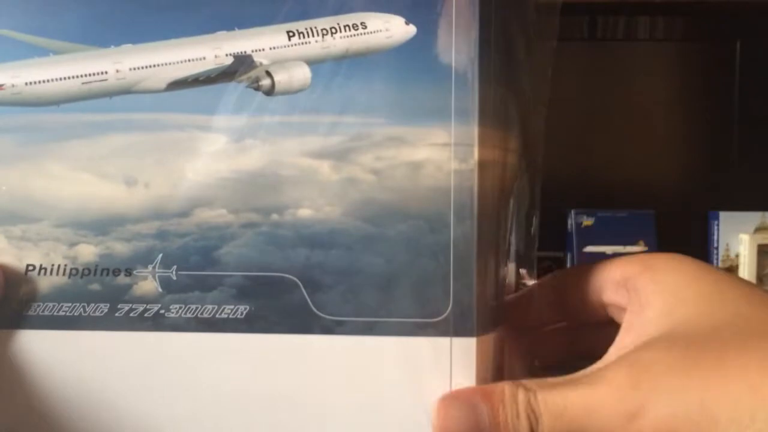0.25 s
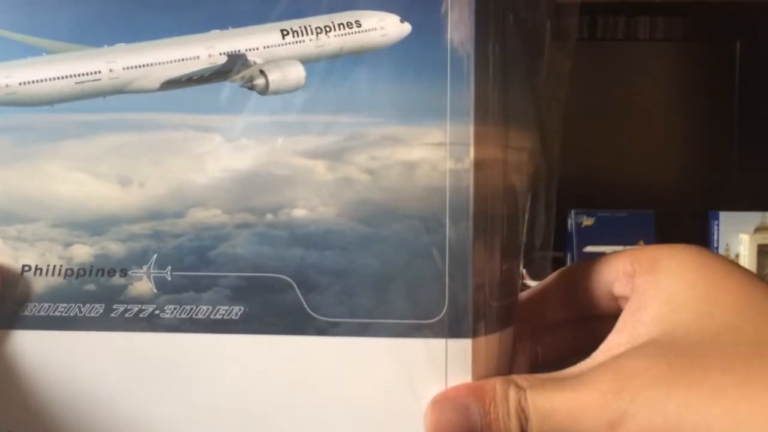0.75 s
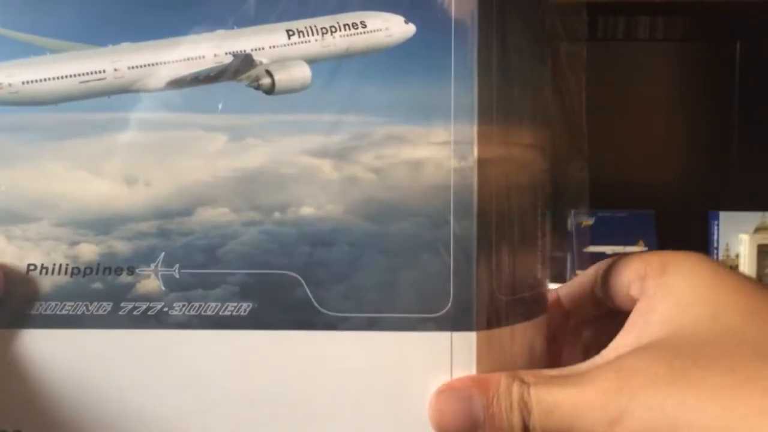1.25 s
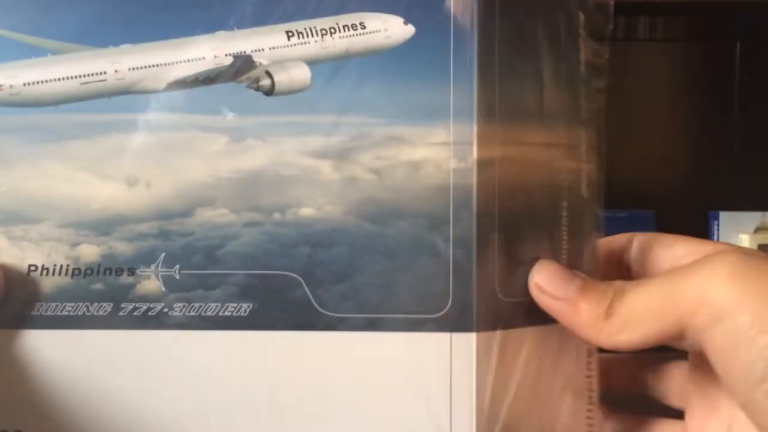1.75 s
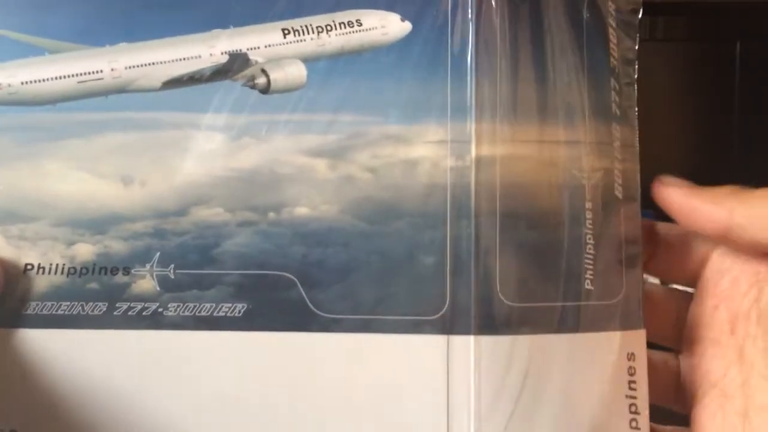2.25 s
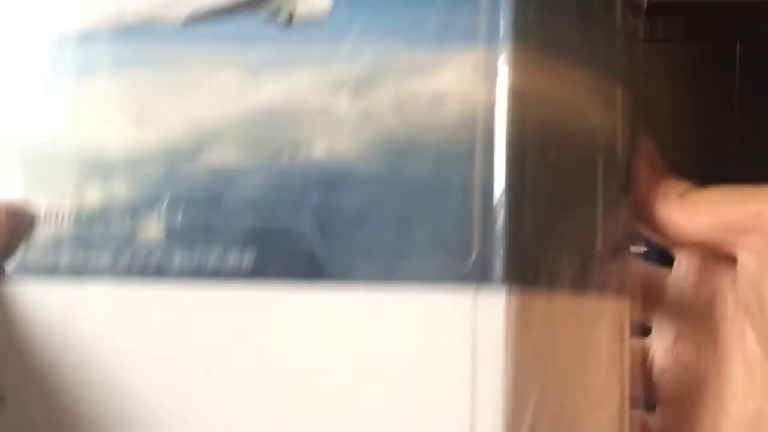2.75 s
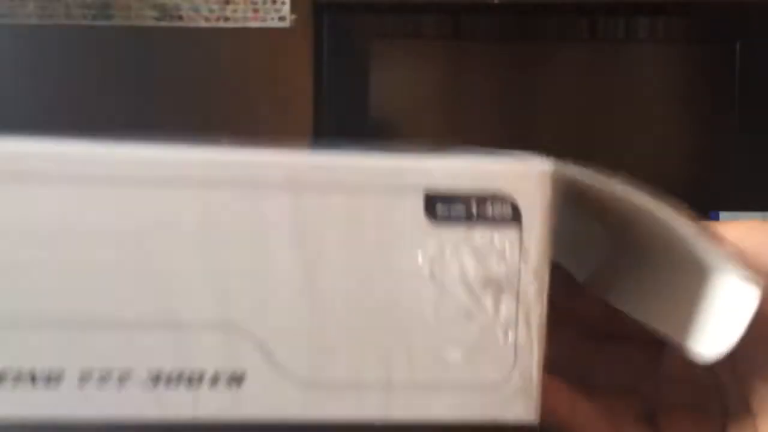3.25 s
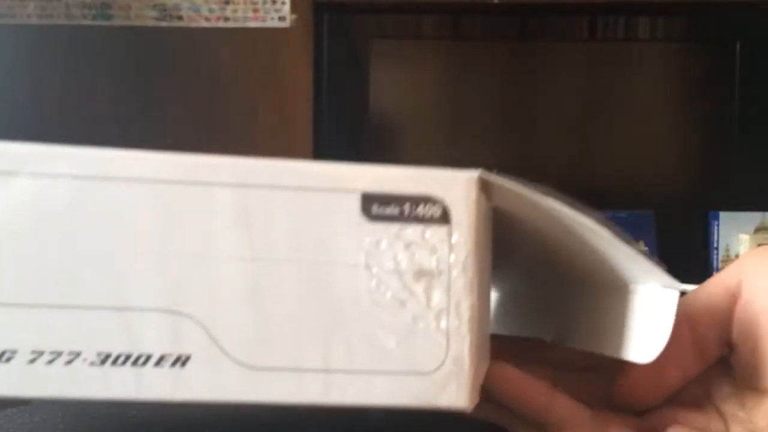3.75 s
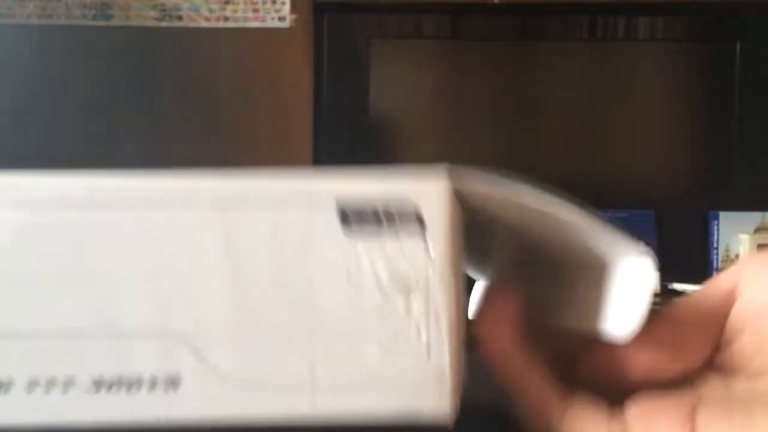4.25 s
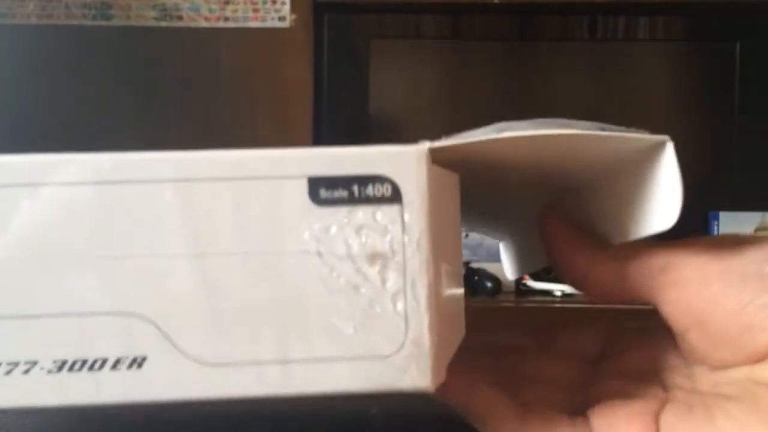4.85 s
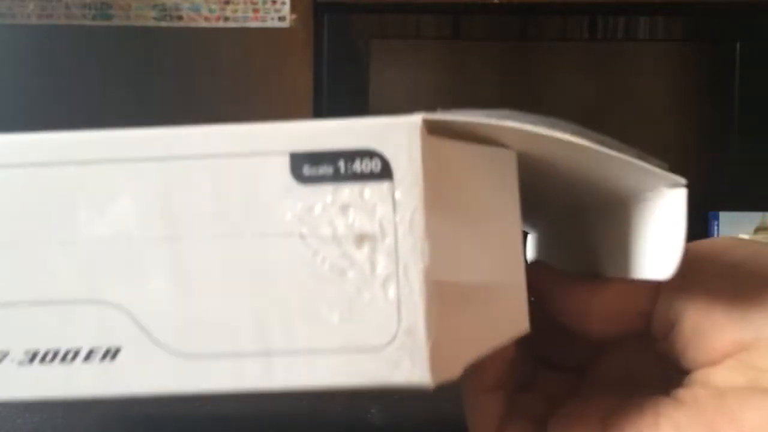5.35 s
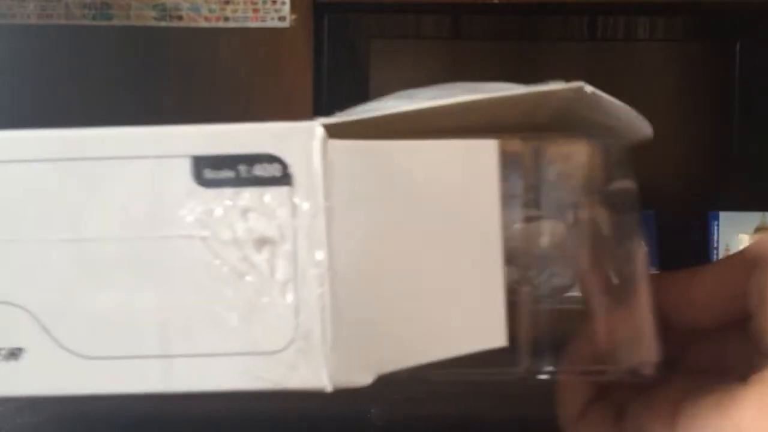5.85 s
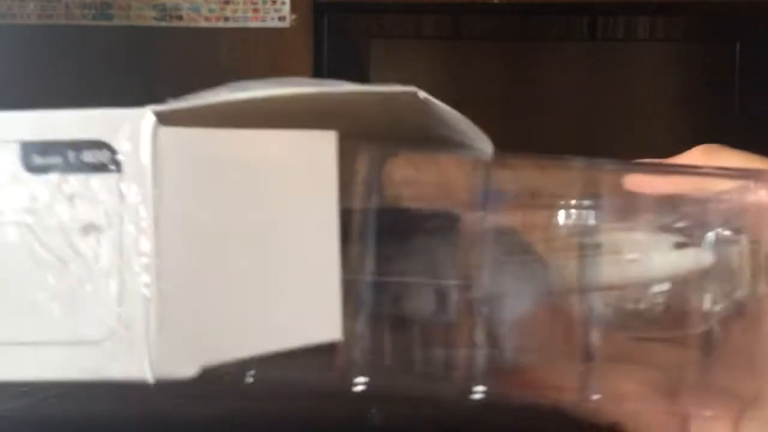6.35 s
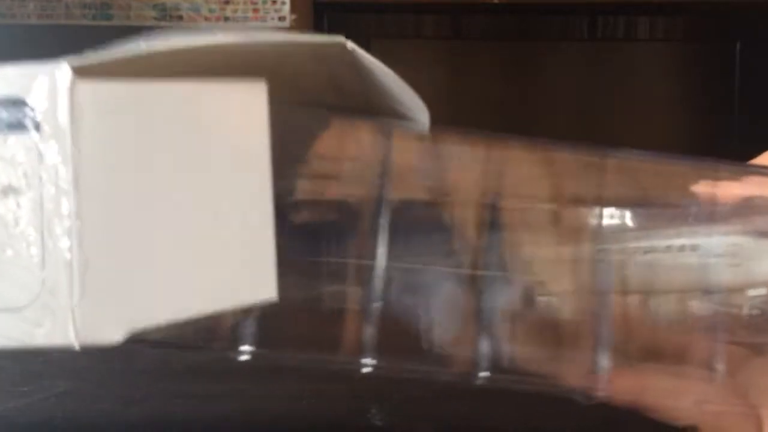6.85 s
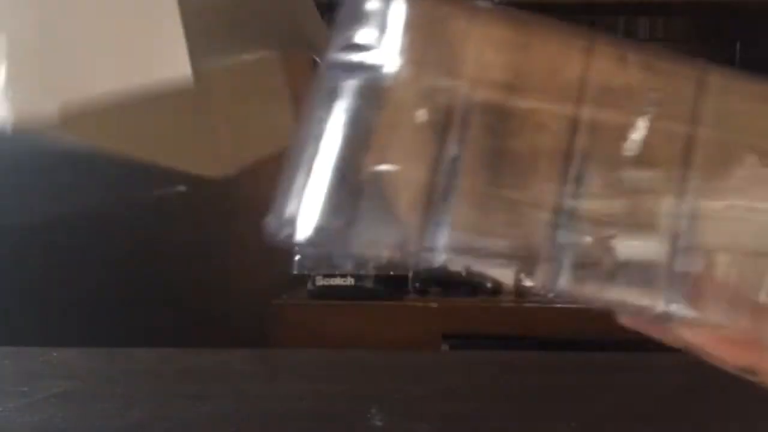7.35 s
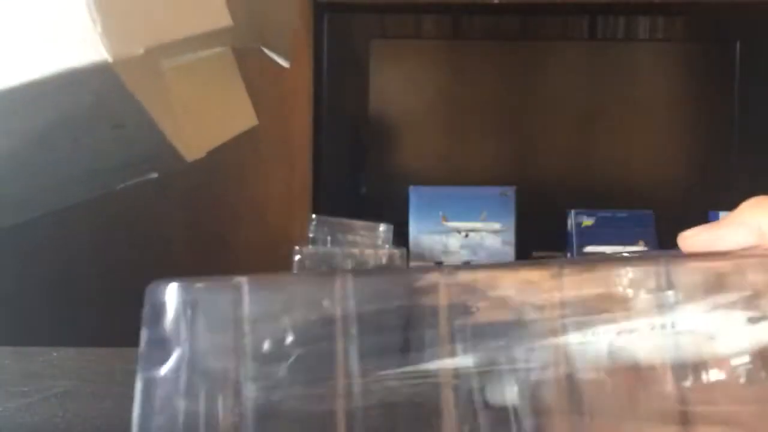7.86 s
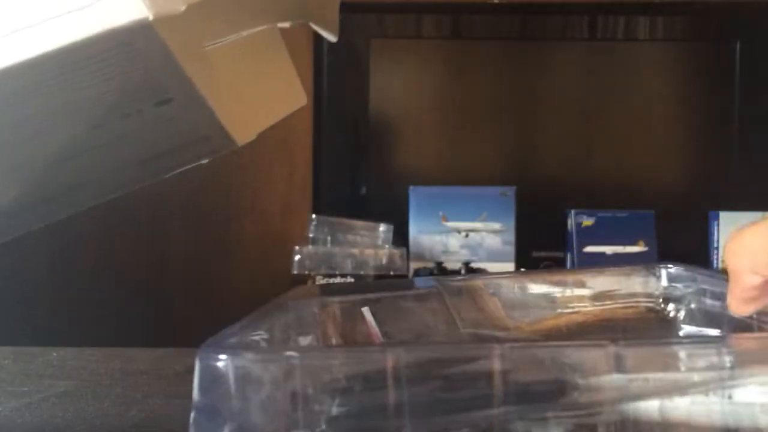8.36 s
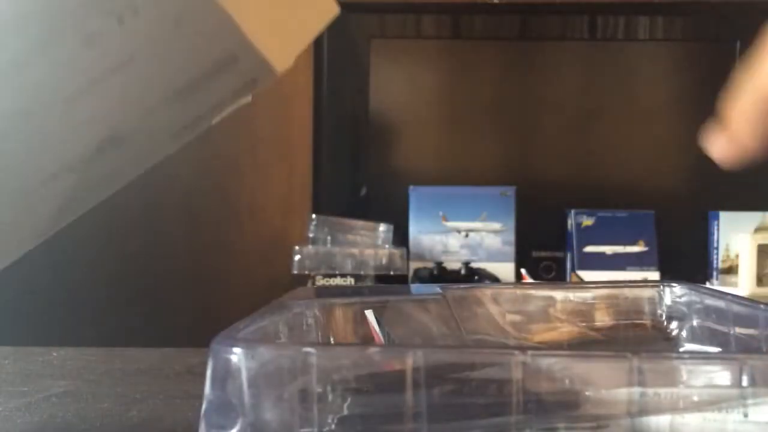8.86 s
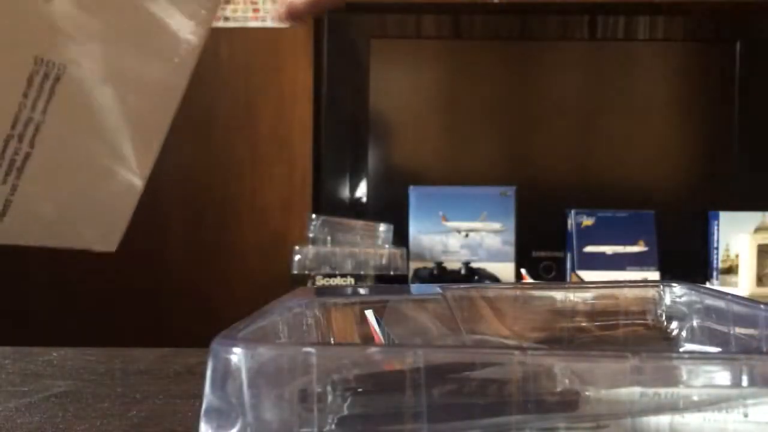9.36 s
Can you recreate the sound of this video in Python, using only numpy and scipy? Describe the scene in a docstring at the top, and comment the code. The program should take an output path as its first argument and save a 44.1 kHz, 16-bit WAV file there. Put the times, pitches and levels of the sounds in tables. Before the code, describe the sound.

A close phone microphone in a small room, with faint air noise and a low mains hum. Hands rub a glossy card box with faint ticks; at about 1.15 seconds a tight cluster of loud, hard snaps bursts out, with smaller creaky knocks at 1.25. Quiet scrapes and light film crackles follow until a sharp pop at 2.8. Soft rubbing continues; clicks and creaks gather from 4.2 to 4.55, and a bright crackling snap hits at 4.8. From 5.4 to 6.5 a gritty, steady drag draws the stiff plastic tray out, with knocks at 5.75 and 6.2. After a quieter stretch come clacks around 7.1 to 7.3. A loud, hard knock lands at 7.9, then crackly plastic clatter and dull thuds from 8.05 to 8.8, including a short buzz at 8.64. Only faint rubs and ticks remain to about 9.5.

```python
"""A glossy cardboard box pops, knocks and scrapes as hands open it and slide a stiff clear plastic tray out.
Pops and knocks are bursts of noise and short pushes that ring the panels, the plastic and the air in the box.
Rubbing and the long pull are gritty noise shaped by card, glossy skin and thin film, with a low shudder below.
Small creaks, film crackles, soft thuds of the palm and one buzz of the tray are added.
A small room answers over air noise and a faint mains hum, all heard close to a phone."""
import sys
import numpy as np
from scipy import signal
from scipy.fft import rfft, irfft, next_fast_len
from scipy.io import wavfile
from scipy.ndimage import uniform_filter1d, map_coordinates

SR = 44100
rng = np.random.default_rng(int(sys.argv[2]) if len(sys.argv) > 2 else 0)


def master(y):
    """Save y as 16-bit WAV."""
    cut = np.clip(np.atleast_2d(y).T, -1, 1)
    pcm = np.round(cut * 32767)  # scale
    wavfile.write(sys.argv[1], SR, pcm.astype(np.int16))


N = 422919  # length in samples

# pops and knocks: start_s, level_db, panel_pitch_hz, snap_db and thump_db (beside the body), rattle_t60_s,
# crease_pitch_hz
POP_EVENTS = [(0.013, -27.5, 330, -17, -15, 0.11, 2820), (0.068, -34, 320, -14.5, -16, 0.032, 9300),
              (0.221, -31, 770, -11, -6, 0.029, 4900), (0.34, -48, 460, -6, -29, 0.067, 10100),
              (0.534, -25.5, 465, -27, -46, 0.085, 2780), (0.799, -26, 704, -27, -42, 0.067, 2770),
              (0.854, -30.5, 496, -39, -27, 0.068, 2850), (0.886, -36, 458, -31, -29, 0.11, 2830),
              (0.97, -33, 818, -25, -32, 0.081, 2800), (0.982, -28.5, 550, -27, -37, 0.12, 3390),
              (1.052, -37, 800, -25, -30, 0.045, 2800), (1.065, -29, 828, -27, -35, 0.094, 3570),
              (1.079, -35, 477, -20, -26, 0.06, 2810), (1.099, -42, 821, -19, -13, 0.11, 2820),
              (1.129, -10, 1020, -9.5, -17, 0.016, 2760), (1.135, -8.5, 549, -21.5, -20, 0.042, 3830),
              (1.157, -11.5, 1600, -16, -25.5, 0.031, 2920), (1.169, -4, 680, -25, -28, 0.03, 2800),
              (1.17, -4, 1600, -18.5, -28, 0.046, 2810), (1.251, -19.5, 517, -22, -14.5, 0.074, 3400),
              (1.263, -19.5, 607, -15.5, -19, 0.03, 3270), (1.397, -34.5, 766, -18, -12, 0.043, 2880),
              (1.455, -35, 557, -16, -12, 0.21, 3240), (1.508, -27, 1700, -13, -38, 0.023, 9960),
              (1.519, -28, 480, -3.5, -17, 0.063, 10500), (1.624, -40, 1620, -16, -27, 0.08, 2780),
              (1.67, -39, 358, -22, -10, 0.098, 13800), (1.933, -34.5, 334, -21, -22, 0.083, 2800),
              (2.001, -32.5, 1900, -19, -9, 0.076, 3100), (2.016, -25.5, 500, -24, -18, 0.19, 2880),
              (2.15, -23.5, 1600, -19, -20, 0.024, 2300), (2.156, -24.5, 2240, -25, -19, 0.069, 2780),
              (2.205, -31, 1630, -15, -19, 0.28, 3020), (2.234, -27.5, 1690, -13, -22, 0.15, 2780),
              (2.317, -38, 1670, -16.5, -22, 0.11, 6700), (2.751, -29, 1515, -26, -20, 0.077, 3430),
              (2.787, -25, 1700, -16, -10, 0.038, 3500), (2.813, -11, 762, -12.5, -18.5, 0.051, 4020),
              (3.019, -35, 990, -20, -31, 0.06, 2800), (3.086, -25, 820, -25.5, -25, 0.046, 3750),
              (3.122, -34.5, 626, -18, -19, 0.051, 3880), (3.19, -35, 616, -9, -35, 0.19, 3930),
              (3.227, -32.5, 587, -11.5, -12, 0.068, 4010), (3.347, -23, 490, -23.5, -25, 0.039, 2970),
              (3.48, -32.5, 855, -23.5, -34, 0.11, 2910), (3.607, -38, 442, -14.5, -27.5, 0.037, 4340),
              (3.997, -33.5, 434, -23.5, -15.5, 0.092, 2840), (4.039, -30.5, 338, -17, -15, 0.035, 5100),
              (4.057, -26.5, 356, -18.5, -23, 0.091, 8300), (4.113, -22.5, 660, -25, -23, 0.054, 3270),
              (4.151, -44, 355, -4, -20, 0.22, 2740), (4.176, -14, 824, -20.5, -23, 0.096, 3160),
              (4.198, -24, 500, -18, -27, 0.045, 3100), (4.223, -20.5, 450, -20, -12, 0.093, 3170),
              (4.294, -36, 635, -17, -22, 0.036, 2810), (4.32, -31, 961, -18, -23, 0.095, 2980),
              (4.36, -33, 910, -28, -30, 0.046, 3200), (4.373, -24.5, 600, -27, -36, 0.083, 3230),
              (4.432, -30, 1870, -23, -20, 0.04, 2960), (4.446, -27.5, 423, -10.5, -17, 0.17, 2764),
              (4.462, -26, 440, -14, -12, 0.14, 2790), (4.483, -27.5, 630, -14, -15, 0.2, 2740),
              (4.535, -24, 1680, -19.5, -17, 0.053, 3150), (4.703, -39.5, 860, -20.5, -12, 0.16, 3500),
              (4.756, -34.5, 590, -23, -23, 0.049, 2800), (4.823, -13, 865, -14, -25.5, 0.047, 4160),
              (4.893, -28.5, 649, -9.5, -10, 0.055, 3500), (4.983, -39, 584, -13, -13, 0.076, 3100),
              (5.068, -28.5, 706, -19.5, -25, 0.076, 3970), (5.143, -26, 700, -27.5, -25, 0.077, 3200),
              (5.213, -29, 650, -30, -22, 0.047, 3560), (5.329, -33, 460, -29, -15, 0.087, 2820),
              (5.525, -30, 485, -15, -29, 0.078, 2930), (5.542, -29, 635, -24, -21, 0.065, 3050),
              (5.581, -26, 762, -24, -18, 0.06, 3330), (5.732, -17, 630, -19, -41, 0.059, 3440),
              (5.752, -10.5, 507, -16, -26.5, 0.031, 2800), (5.883, -20.5, 343, -15, -7.5, 0.061, 3460),
              (6.218, -16.5, 600, -30.5, -31, 0.041, 3860), (6.307, -28, 1340, -19, -28, 0.15, 3180),
              (6.433, -27, 692, -10, -21, 0.071, 3420), (6.852, -44, 700, -10, -27, 0.033, 3500),
              (6.985, -31.5, 620, -24, -29, 0.055, 2800), (7.037, -19.5, 517, -14.5, -12, 0.11, 3270),
              (7.054, -29, 503, -11, -24, 0.074, 3000), (7.087, -13, 330.5, -24, -29, 0.061, 3820),
              (7.161, -16.5, 625, -15, -23, 0.076, 2630), (7.174, -27.5, 345, -21, -12.5, 0.089, 3450),
              (7.231, -32.5, 689, -13.5, -26, 0.067, 2820), (7.277, -13.5, 666, -21.5, -22.5, 0.06, 6650),
              (7.318, -33, 795, -20, -21, 0.06, 3010), (7.379, -31, 756, -9.5, -20, 0.079, 2950),
              (7.402, -31.5, 605, -31, -16, 0.049, 3860), (7.872, -19.5, 522, -42, -37, 0.031, 3030),
              (7.875, -5.5, 650, -30, -20.5, 0.06, 3340), (8.02, -25.5, 369, -33, -30, 0.087, 3230),
              (8.03, -17, 725, -33, -21, 0.1, 2840), (8.042, -16.5, 620, -13, -24, 0.083, 3030),
              (8.082, -23, 560, -24, -20, 0.04, 2900), (8.111, -24, 1350, -25.5, -37, 0.2, 3530),
              (8.268, -32.5, 1900, -15, -24, 0.049, 2890), (8.287, -32, 1230, -14, -14, 0.087, 2900),
              (8.32, -33, 706, -24, -26, 0.067, 4160), (8.339, -17, 1010, -14, -15.5, 0.14, 3680),
              (8.401, -24.5, 1080, -20.5, -20, 0.24, 4120), (8.425, -26, 614, -23, -25, 0.049, 2900),
              (8.487, -31, 630, -24, -29, 0.092, 2900), (8.505, -28.5, 617, -18, -23, 0.086, 3250),
              (8.562, -19.5, 540, -10.5, -31, 0.046, 4300), (8.622, -22, 590, -32, -23, 0.041, 4200),
              (8.639, -12, 1250, -21, -19, 0.12, 3080), (8.665, -14.5, 580, -27, -22, 0.03, 2920),
              (8.804, -27.5, 816, -15, -10.5, 0.034, 3510), (9.064, -40, 420, -7.5, -30, 0.14, 3880),
              (9.124, -47, 1605, -11, -20, 0.06, 6960), (9.404, -41, 1490, -25, -15, 0.06, 3510),
              (9.455, -32.5, 308, -15.5, -7.5, 0.075, 3280), (9.53, -43, 655, -16.5, -2, 0.11, 3300)]
# panels of the box and tray: pitch_hz, width_hz, level_db
PANEL_MODES = [(373, 130, -1), (564, 217, -2), (800, 174, 1), (992, 230, -2), (1324, 240, -0.5),
               (1640, 180, 0.5), (1928, 230, 2), (2558, 520, -0.5), (3300, 120, -13.5), (4240, 190, -18.5)]
# tone of scraped card: pitch_hz, level_db (per Hz)
CARD_TONE = [(120, -30), (200, -2), (407, -5.5), (557, 2.5), (1060, -6.5), (1430, -6), (1760, -8.5),
             (2550, -12), (6000, -43.5), (7800, -49), (13200, -120)]
# tone of the plastic snap and the glossy hiss: pitch_hz, level_db (per Hz)
SHEEN_TONE = [(1470, -26.5), (2500, -4), (3910, -6.5), (4380, -8), (4760, -9), (7970, -11), (13000, -17),
              (15300, -32.5)]
# air inside the box: pitch_hz, width_hz, level_db
HOLLOW_MODES = [(99, 78, 1.5), (197, 150, 4)]
# mains hum: pitch_hz, level_db
HUM_TONES = [(120, -61.5), (240, -87.5), (360, -89.5)]
# tone of the air noise in the room: pitch_hz, level_db (per Hz)
AIR_TONE = [(20, -49.5), (50, 13), (200, -8.5), (300, -9), (700, -24.5), (1200, -18.5), (1650, -4.5),
            (2500, -21.5), (6000, -23), (15300, -28)]
# how long the room's answer takes to fall 60 dB: pitch_hz, t60_s
ROOM_DECAY = [(150, 0.47), (1000, 0.088), (5000, 0.22), (14000, 0.13)]
# rustle of the thin window film: pitch_hz, level_db (per Hz)
FILM_TONE = [(4000, -34.5), (7000, -3.5), (9500, 0), (13000, -1.5), (15300, 0)]
# the tray's stiff walls: pitch_hz, width_hz, level_db
TRAY_MODES = [(1230, 27, 1), (1520, 24, 5), (2030, 34, 4), (3050, 50, -4), (3680, 50, -10), (4980, 50, -7),
              (5610, 54, -8)]
# the palm meets the box: start_s, level_db
PALM_THUDS = [(2.026, -31.5), (2.086, -47), (2.164, -37), (2.75, -37), (4.197, -38), (8.043, -21),
              (8.586, -25), (8.604, -31), (9.47, -38), (9.498, -47)]
# small stiff patches that creak: start_s, length_s, pitch_hz, level_db
CREAK_EVENTS = [(1.25, 0.13, 3300, -46), (2.143, 0.18, 2030, -46), (4.035, 0.095, 2080, -41.5),
                (.534, 0.023, 1500, -45), (1.252, 0.02, 1460, -27.5), (2.752, .04, 3500, -47),
                (.028, 0.021, 390, -35), (6.4, 0.034, 600, -34), (4.345, 0.057, 3160, -47.5),
                (1.14, 0.038, 1400, -28), (4.53, 0.15, 1940, -39.5), (6.497, 0.029, 1125, -43.5),
                (0.95, .04, 1540, -52), (2.2, 0.093, 1640, -41), (8.105, 0.088, 1320, -33.5),
                (8.4, 0.067, 680, -40), (7.285, 0.089, 660, -40)]
# fingers rub and creases drag: loudest_s, rise_s, fall_s, scrape_db, hiss_db, rustle_db,
# tautness_db (taut card scrapes brighter)
RUB_STROKES = [(0.022, 0.088, .15, -42, -55.5, -53, -7), (0.222, 0.0084, 0.064, -40, -69, -53, 4),
               (0.341, .004, 0.03, -71, -79, -62, 4), (0.4, 0.1, 1, -52, -66, -72, -4),
               (0.534, 0.0024, 0.028, -38.5, -76, -81, 27.5), (0.69, 0.13, 0.23, -64, -90, -97, -19),
               (0.77, 0.021, 0.014, -52, -96, -89, -18), (0.903, 0.11, 0.036, -46.5, -63, -67, -15),
               (0.992, 0.037, 0.034, -36, -55, -61, -9), (1.101, 0.06, 0.27, -33, -52, -60, -9),
               (1.13, 0.0063, 0.14, -20, -23, -31.5, 9), (1.253, 0.0058, 0.04, -36, -35, -63, 16),
               (1.4, 0.015, 0.039, -58, -53, -64, 3), (1.517, 0.14, 0.069, -44.5, -52, -43, 0.5),
               (1.684, 0.096, 0.28, -60, -67, -60.5, -2), (1.8, 0.085, 0.047, -50, -64, -64, 6.5),
               (1.99, 0.14, 0.16, -42.5, -59, -51, 8), (2.115, .004, 0.016, -67, -60, -54, 6),
               (2.172, 0.11, 0.16, -37, -48.5, -53, 5), (2.324, 0.019, 0.03, -52.5, -61, -51, 33),
               (2.41, 0.14, 0.03, -51, -61, -68, 2), (2.519, 0.2, 0.12, -49, -58, -55.5, -10.5),
               (2.718, 0.035, 0.068, -48, -58, -54.5, -7), (2.753, 0.0068, 0.14, -27.5, -41, -73, 5.5),
               (2.813, 0.0068, 0.076, -26.5, -33, -53, -10.5), (2.915, 0.024, 0.024, -56, -55, -45, 0),
               (3.19, 0.32, 0.62, -53, -63.5, -64, -5), (3.35, 0.47, 0.068, -57.5, -57, -61, -8),
               (3.495, 0.05, 0.11, -45, -51.5, -55, -11.5),
               (3.606, 0.0082, 0.067, -47.5, -85.5, -80.5, 1.5), (4.0, 0.24, .1, -56, -65, -77, -20.5),
               (4.062, 0.078, 0.078, -45.5, -56, -58, -14), (4.11, 0.017, 0.27, -46, -61, -61, 6),
               (4.178, 0.0043, 0.029, -28.5, -46, -44, -22), (4.21, 0.046, 0.3, -34, -44, -51.5, 1),
               (4.334, 0.0036, 0.017, -60, -57, -49, 2), (4.377, 0.024, 0.016, -40, -69, -78, -13),
               (4.452, 0.011, 0.2, -35.5, -60, -69, -1), (4.51, 0.0035, 0.013, -46, -53, -44, 1),
               (4.54, 0.0084, 0.067, -29.5, -43, -42, 14), (4.8, 0.13, 0.19, -47, -61, -64, -4),
               (4.829, 0.01, 0.13, -25.5, -39, -42.5, -2.5), (5.1, 0.13, 0.15, -47, -59, -63, -9),
               (5.255, 0.061, 0.037, -34.5, -46.5, -52, -7), (5.4, .14, 0.13, -33, -42, -48.5, -5.5),
               (5.758, 0.076, 0.25, -27, -42, -33.5, 2), (5.886, 0.051, 0.07, -25, -58.5, -42.5, -7.5),
               (7.094, 0.14, 0.076, -37.5, -45.5, -57, -5), (7.165, 0.05, 0.038, -33.5, -44, -62, -12),
               (7.282, 0.036, 0.056, -44, -60, -53, -16), (7.377, 0.47, 0.073, -36, -43.5, -49, -3),
               (7.878, 0.005, 0.05, -18, -36.5, -55.5, -11), (7.92, .03, 0.36, -46.5, -62, -79, -18),
               (8.049, 0.01, 0.13, -20, -26, -33, -2), (8.138, 0.15, 0.038, -29.5, -51, -64, 4),
               (8.295, 0.089, 0.033, -35, -67, -63, 0), (8.349, 0.044, 0.053, -24, -32.5, -37, -5),
               (8.425, 0.061, 0.076, -34, -58, -60, 9), (8.49, 0.28, 0.13, -41.5, -58, -62.5, -0.5),
               (8.515, 0.0068, 0.022, -32.5, -62, -48, 4), (8.532, .01, 0.021, -42, -60, -64, -4),
               (8.564, 0.004, 0.062, -24, -41, -36, 11), (8.601, 0.076, 0.098, -29, -43, -65, -13),
               (8.645, 0.0063, 0.14, -34, -33, -38, -11), (8.807, 0.014, 0.039, -34.5, -39.5, -40.5, -12.5),
               (9.068, 0.13, 0.16, -59.5, -55, -53.5, -3), (9.232, 0.012, 0.21, -66, -62.5, -66, -1),
               (9.405, .015, 1, -54.5, -64.5, -70.5, 4)]
# the tray is drawn out along the card: time_s, scrape_db, hiss_db, rustle_db, tautness_db
TRAY_PULL = [(5.48, -81, -80, -86, 11), (5.54, -34, -46.5, -50, 4), (5.63, -35, -42, -53, 5),
             (5.74, -33.5, -38, -63, 4), (5.86, -36.5, -36.5, -53, -1), (6.0, -32.5, -51, -55, 4),
             (6.1, -30, -39.5, -48, 0), (6.165, -36.5, -53.5, -55, 4), (6.24, -36, -47, -51, 2),
             (6.4, -36, -44.5, -50, 10), (6.53, -54.5, -56, -61, -5), (6.66, -48.5, -54.5, -61, -3),
             (6.71, -51.5, -60.5, -66, -10), (6.95, -58, -61, -69, 1), (6.99, -40, -48, -48, 11),
             (7.06, -78, -64, -90, -2)]
# fingers resting on the card: scrape_db, hiss_db, rustle_db
RESTING_DB = (-82.5, -92, -93)
# the thin film crackles: start_s, level_db, pitch_hz
CRACKLE_EVENTS = [(0.069, -47, 9300), (0.223, -37, 10300), (0.3405, -32, 10500), (0.5342, -44, 7640),
                  (1.1298, -23, 7110), (1.2526, -44, 7350), (1.507, -25, 10300), (2.7541, -43.5, 9530),
                  (2.811, -29, 7500), (3.189, -35.5, 9260), (4.059, -38, 8230), (4.178, -22, 7900),
                  (4.4483, -31.5, 8350), (4.482, -28.5, 8770), (4.5408, -26.5, 7800), (4.57, -35, 9800),
                  (4.8252, -13.5, 12100), (4.9836, -47, 8120), (5.0695, -44, 11800), (5.752, -24, 10790),
                  (6.432, -40, 10100), (7.034, -33.5, 9460), (7.0838, -24, 10800), (7.158, -42, 8770),
                  (7.274, -26.5, 7300), (7.3143, -38, 10300), (8.0481, -22.5, 7120), (8.3397, -23.5, 7260),
                  (8.563, -20, 9350), (8.644, -30, 7080), (8.8039, -28, 13170)]
# what rings while the tray is drawn out: pitch_hz, width_hz, level_db
SLEEVE_MODES = [(550, 240, -2), (850, 150, -0.5), (1320, 290, 0.5), (2420, 330, 1.5), (3260, 330, -0.5),
                (4420, 570, 4.5)]
# bend of those resonances over time: time_s, pitch_factor
SLEEVE_BEND = [(5.5, 1.06), (5.75, 1.05), (6.05, 1), (6.3, 0.95), (7.0, 1.01)]

EDGE_HZ, TOP_HZ = 15350, 16478  # the phone starts to cut; the phone keeps nothing from here up
FADE_DB = 30  # what a stroke gains over its rise time and loses over its fall time
# shudder level at a scrape gain of -46 dB; dB added per dB of scrape; smoothing window in seconds
SHUDDER_DB, SHUDDER_GROWS, SHUDDER_S = -62, 0.12, 0.26
TICKS_PER_S, TICK_DB, TICK_SPREAD_DB = 4, 0.5, 4  # chance ticks; level over the scrape, and its spread
BODY_DB, SNAP_DB, THUMP_DB = -4.5, 5.5, 2.5  # trim of each part in a pop
KICK, KICK_S = 1.3, 0.000059  # first clean contact of a pop: size beside the noise, half length in seconds
BUZZ_AT_S, BUZZ_DB, BUZZ_T60_S = 8.642, -26, 0.5  # the tray buzzes as it settles
CRACKLE_T60_S, CRACKLE_WIDTH = 0.005, 0.6  # width as a share of the pitch
PULL_EVEN = 1  # how much of the 1.5-fold clumping the steady pull takes away
FLEX_PER_S, VALLEY_DB = 12, -6  # random swell points per second; what sounds between resonances


def amp(db):
    """Turn dB into gain."""
    return 10 ** (np.asarray(db) / 20)


def unit(x):
    """Scale to an average (rms) strength of 1."""
    return x / np.sqrt(np.mean(x ** 2) + 1e-20)


def along(points, hz):
    """Read a value between (Hz, value) points on a log pitch axis."""
    f, v = np.transpose(points)
    return np.interp(np.log(hz + 1), np.log(f + 1), v)


def curves(rows):
    """Give one value per sample for each column after the time."""
    s, *cols = np.transpose(rows)
    return [np.interp(np.arange(N) / SR, s, c, left=-120) for c in cols]


def wobble(rate):
    """Draw a smooth random curve through `rate` random points a second."""
    knots = rng.standard_normal(int(N * rate / SR) + 4)
    return map_coordinates(knots, [np.arange(N) * rate / SR])


def filtered(x, response):
    """Shape a sound by a (complex) response to each frequency."""
    m = next_fast_len(len(x) + 4096)
    spectrum = rfft(x, m) * response(np.fft.rfftfreq(m, 1 / SR))
    return irfft(spectrum, m)[:len(x)]


def resonances(modes, f):
    """Ring at each (Hz, width, dB) mode, only after being struck; neighbours alternate in sign."""
    return sum((-1) ** k * amp(db) * 1j * f * w / (c * c - f * f + 1j * f * w)
               for k, (c, w, db) in enumerate(modes))


def room_tone():
    """Air noise is steady; the mains hum is sine tones that waver slightly in level and phase."""
    t = np.arange(N) / SR
    hum = 0
    for hz, db in HUM_TONES:
        level = np.sqrt(2) * amp(db + .8 * wobble(3.1))
        hum = hum + level * np.sin(2 * np.pi * hz * t + .15 * wobble(5.0))
    air = unit(filtered(rng.standard_normal(N), lambda f: amp(along(AIR_TONE, f))))
    return hum + amp(-68.0) * air


def layers(scrape_db, sheen_db, film_db, taut_db):
    """Turn dB into four gains: low scrape, high scrape, hiss, rustle; taut card favours high scrape."""
    return amp([scrape_db - taut_db / 2, scrape_db + taut_db / 2, sheen_db, film_db])


def strokes():
    """Hand movement as four gains over time: each rub swells and fades, the pull runs on."""
    t = np.arange(N) / SR
    pulling = (t > TRAY_PULL[0][0]) * (t < TRAY_PULL[-1][0])
    gains = layers(*curves(TRAY_PULL)) * pulling + layers(*RESTING_DB, 0)[:, None]
    for s, rise, fall, *levels in RUB_STROKES:
        rise, fall = max(rise, .003), max(fall, .01)
        near = slice(max(round((s - 2 * rise) * SR), 0), round((s + 2 * fall) * SR))
        away = np.maximum((s - t[near]) / rise, (t[near] - s) / fall)
        gains[:, near] += layers(*levels)[:, None] * amp(-FADE_DB * away)
    return gains


def gritty(per_s, spread_db, smooth):
    """Rough contact: tiny slips of uneven size on a share of smooth noise."""
    size = amp(np.minimum(spread_db * rng.exponential(size=N), 14))
    slips = (rng.random(N) < per_s / SR) * rng.standard_normal(N) * size
    return unit(unit(slips) + smooth * rng.standard_normal(N))


def flexing(x, modes, bend, flex_db):
    """Flexing card: each resonance swells on its own and follows a pitch factor over time."""
    f, t, z = signal.stft(x, SR, nperseg=512)
    at = np.minimum(t * SR, N - 1).astype(int)
    bent = f[:, None] / np.interp(t, *np.transpose(bend))
    power = sum(np.abs(resonances([(c, w, db + flex_db * wobble(FLEX_PER_S)[at])], bent)) ** 2
                for c, w, db in modes)
    gain = np.sqrt(power + amp(2 * VALLEY_DB)) * amp(along(CARD_TONE, f))[:, None]
    even = gain / np.sqrt(np.mean(gain ** 2, axis=0))  # only the tone changes over time
    return unit(signal.istft(z * even, nperseg=512)[1][:N])


def shifting(x, depth_db):
    """Bending shifts resonances: random gain in drifting patches of pitch and time."""
    z = signal.stft(x, nperseg=512)[2]
    field = uniform_filter1d(rng.standard_normal(z.shape), size=3, axis=0)
    field = uniform_filter1d(field, size=12, axis=1)
    return unit(signal.istft(z * amp(depth_db * unit(field)), nperseg=512)[1][:N])


def slide(gains):
    """Stick and slip comes in clumps that shake the panels, the glossy skin and the film together."""
    clump_db_wave = 1.2 * wobble(30) + 1.5 * wobble(110)
    first, second, *_, second_last, last = [row[0] for row in TRAY_PULL]
    pulling, = curves([(0, 0), (first, 0), (second, 1), (second_last, 1), (last, 0)])
    rubbed = flexing(gritty(2500, spread_db=3, smooth=.9), PANEL_MODES, [(0, 1)], flex_db=4)
    drawn = flexing(gritty(6000, spread_db=1.5, smooth=1.5), SLEEVE_MODES, SLEEVE_BEND, flex_db=2.5)
    scrape = np.sqrt(1 - pulling) * rubbed + np.sqrt(pulling) * drawn
    # despite its name, this is the part that passes above about 1150 Hz
    low = filtered(scrape, lambda f: 1 / (1 + (1150 / (f + 1)) ** 4))
    low, high = scrape - low, low  # the filter passes the high part; the rest is low
    gloss = lambda f: amp(along(SHEEN_TONE, f)) / (1 + (f / 7500) ** 4)
    hiss = shifting(filtered(gritty(740, spread_db=8.0, smooth=1.5), gloss), depth_db=3.5)
    film_grit = gritty(600, spread_db=6.0, smooth=0.93)
    rustle = shifting(filtered(film_grit, lambda f: amp(along(FILM_TONE, f))), depth_db=3)
    clumping = amp(clump_db_wave * (1.5 - PULL_EVEN * pulling) - 7)
    return clumping * np.sum(gains * [low, high, hiss, rustle], axis=0)


def shudder(gains):
    """The air in the hollow box shudders with handling and palm bumps; the settling tray buzzes."""
    hollow = lambda f: resonances(HOLLOW_MODES, f)
    rumble = unit(filtered(rng.standard_normal(N), hollow))
    busy_db = uniform_filter1d(20 * np.log10(gains[0]), size=round(SHUDDER_S * SR))
    shake_db = SHUDDER_DB + SHUDDER_GROWS * (busy_db + 46) + 2.0 * wobble(16)
    palm, push = np.zeros(N), np.hanning(SR // 200)
    for s, db in PALM_THUDS:
        palm[round(s * SR):][:len(push)] += amp(db + 6.5) * push
    buzz = unit(filtered(gritty(900, spread_db=2, smooth=0.6), lambda f: resonances(TRAY_MODES, f)))
    since = np.arange(N) / SR - BUZZ_AT_S
    settling = amp(BUZZ_DB - 60 * np.abs(since) / BUZZ_T60_S)
    settling *= np.clip(since / 0.0036, 0, 1) * np.clip(1 - since / 0.11, 0, 1)
    return amp(shake_db) * rumble + filtered(palm, hollow) + settling * buzz


def room(x):
    """The room answers with a fresh noise tail every quarter second; each pitch dies at its own speed."""
    out, step = np.zeros(N + SR), SR // 4
    for at in range(0, N, step):
        hz, t, z = signal.stft(rng.standard_normal(SR // 3), SR, nperseg=256)
        decay = amp(-60 * t / along(ROOM_DECAY, hz)[:, None])
        tail = signal.istft(z * decay, SR, nperseg=256)[1]
        wet = signal.fftconvolve(x[at:at + step], tail / np.linalg.norm(tail))
        out[at + 130:][:len(wet)] += wet  # about 3 ms late
    return out[:N]


def pops(rows):
    """Each pop is a crack and an uneven rattle of contacts; panels near the touched one ring most."""
    t = np.arange(SR // 6) / SR
    out = np.zeros(N + len(t))
    for s, db, hz, snap_db, thump_db, t60, crease_hz in rows:
        noise = rng.standard_normal((3, len(t)))
        contacts = amp(3.2 * np.repeat(rng.standard_normal(len(t) // 128 + 1), 128)[:len(t)])
        rattle = amp(-60 * t / np.clip(t60, .01, .3))

        # body: the blow rings the panels
        blow = (amp(-60 * t / 0.0046) + amp(-10.5) * rattle * contacts) * (1 - np.exp(-t / 0.0018))
        kick = KICK * np.exp(-((t - .001) / KICK_S) ** 2)
        near = [(c, w, level + 10.8 * np.exp(-(np.log(c / hz) / 0.25) ** 2)) for c, w, level in PANEL_MODES]
        soft_hz = 14000 * amp(1.09 * snap_db)  # a contact with little snap shakes only low panels
        body = filtered(blow * noise[0] + kick, lambda f: resonances(near, f) / (1 + 1j * f / soft_hz) ** 2)

        # snap: bright noise, strongest near the crease's pitch; treble dies sooner
        crisp = amp(-60 * t / 0.0084) + amp(-2.0) * rattle ** 2.2 * contacts
        crease = [(crease_hz, 0.1 * crease_hz, 12)]
        tint = lambda f: amp(along(SHEEN_TONE, f)) * (1 + np.abs(resonances(crease, f)))
        snap = crisp * (1 - np.exp(-t / 0.00041)) * filtered(noise[1], tint)

        # thump: a soft shove, then a shudder of the air inside
        push = np.sin(np.pi * np.clip(t / 0.0036, 0, 1)) + 0.59 * rattle * noise[2]
        thump = filtered(push, lambda f: resonances(HOLLOW_MODES, f))

        parts = [(body, BODY_DB), (snap, SNAP_DB + snap_db), (thump, THUMP_DB + thump_db)]
        pop = sum(amp(level) * part / np.abs(part).max() for part, level in parts)
        out[round(s * SR):][:len(t)] += amp(db) * pop
    return out[:N]


def creaks():
    """Fine slips ring one resonance in a stiff patch; each creak starts fast and dies away."""
    out, slips = np.zeros(N), gritty(1600, spread_db=12, smooth=0.16)
    for s, length, hz, db in CREAK_EVENTS:
        at = round(s * SR)
        u = np.arange(round(length * SR)) / (length * SR)  # 0 to 1 through the creak
        ring = filtered(slips[at:at + len(u)], lambda f: resonances([(hz, .28 * hz, 0)], f) ** 2)
        out[at:at + len(u)] += amp(db) * unit(ring) * np.minimum(20 * u, 1) * (1 - u) ** 2
    return out


def crackles():
    """The thin film crackles: a short burst of noise in a high, broad resonance."""
    t = np.arange(SR // 40) / SR
    out = np.zeros(N + len(t))
    for s, db, hz in CRACKLE_EVENTS:
        burst = amp(-60 * t / CRACKLE_T60_S) * np.minimum(t / 0.0018, 1) * rng.standard_normal(len(t))
        ring = filtered(burst, lambda f: resonances([(hz, CRACKLE_WIDTH * hz, 0)], f))
        out[round(s * SR):][:len(t)] += amp(db - 2.0) * ring / np.abs(ring).max()
    return out[:N]


def ticks(gains):
    """Faint pops at chance moments, following the strength of the rubbing up to a limit."""
    at, pitch, snap, size = rng.random((round(TICKS_PER_S * N / SR), 4)).T
    rubbing_db = 20 * np.log10(gains[0, (at * N).astype(int)])
    level_db = np.minimum(rubbing_db + TICK_DB + TICK_SPREAD_DB * (2 * size - 1), -46)
    rows = zip(at * N / SR, level_db, 420 * 2 ** pitch, -14 - 18 * snap)
    return [(s, db, hz, snap_db, -18, .06, 7 * hz) for s, db, hz, snap_db in rows]


def scene():
    """Add the hands' sounds, the room's answer and the room's own tone."""
    gains = strokes()
    hands = slide(gains) + shudder(gains) + pops(POP_EVENTS) + creaks() + crackles() + pops(ticks(gains))
    return (hands + amp(-16.0) * room(hands) + room_tone())[None]


def record(dry):
    """The phone drops steeply near the top and keeps nothing above its band limit."""
    def response(f):
        drop_db = -22 * np.clip((f - EDGE_HZ) / 250, 0, 1) - .015 * np.maximum(f - EDGE_HZ, 0)
        return amp(drop_db) * (f < TOP_HZ)
    return filtered(dry[0], response)[None]


dry = scene()
out = record(dry)
master(out)
```